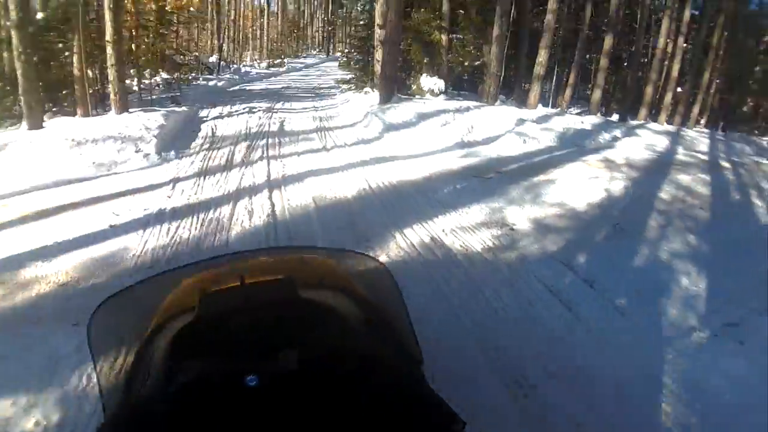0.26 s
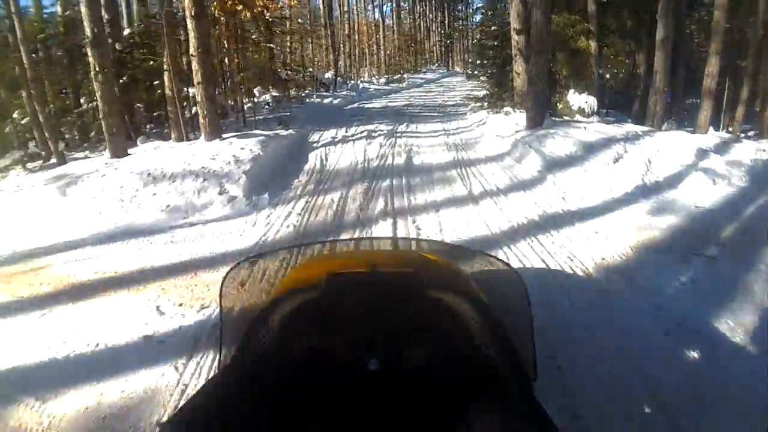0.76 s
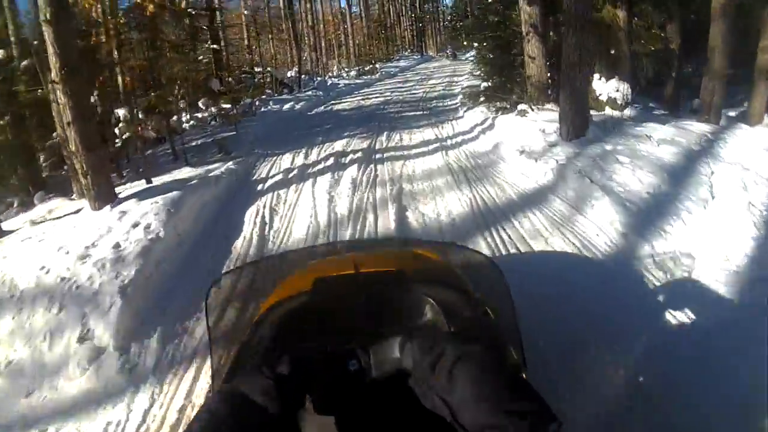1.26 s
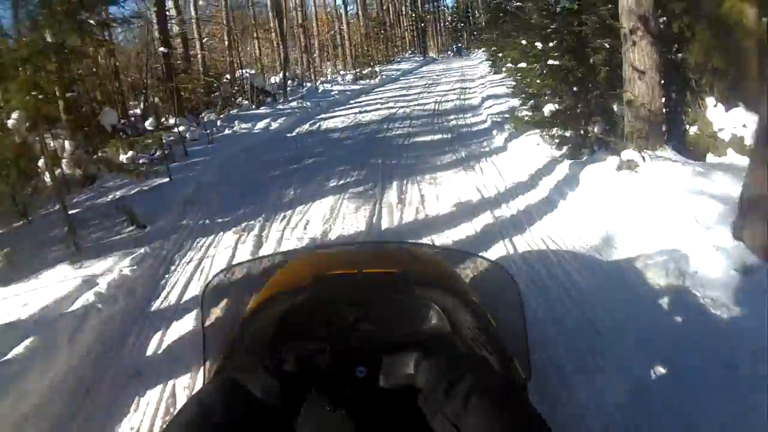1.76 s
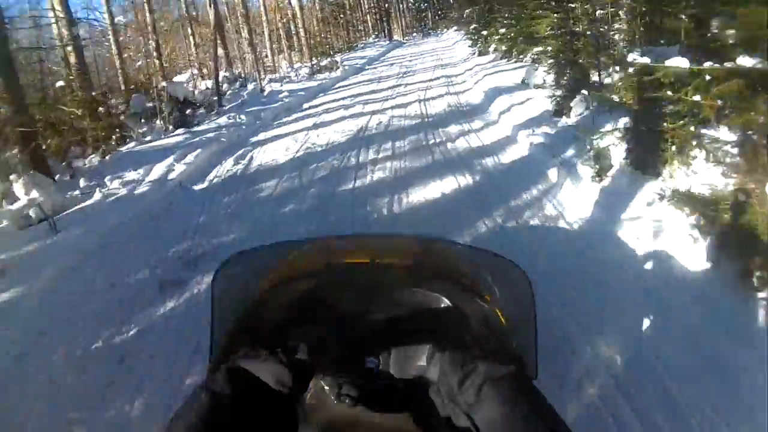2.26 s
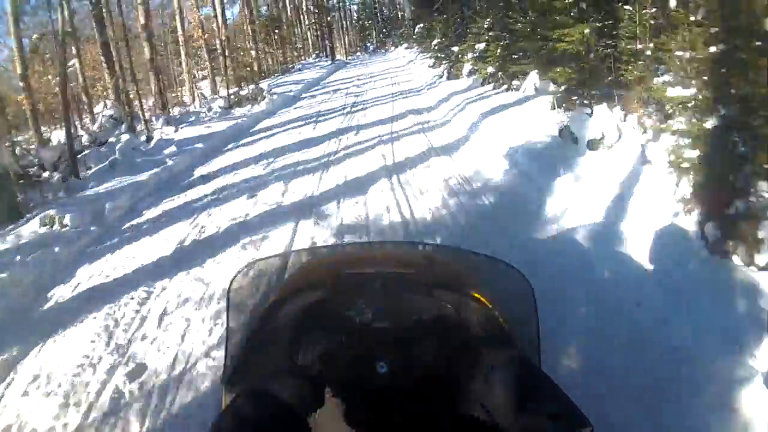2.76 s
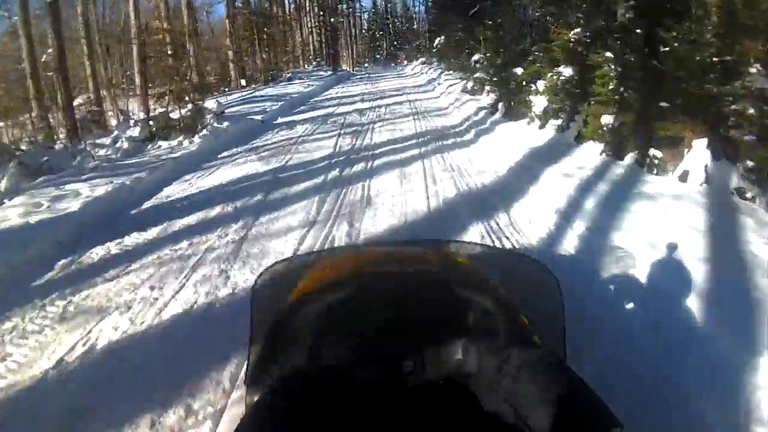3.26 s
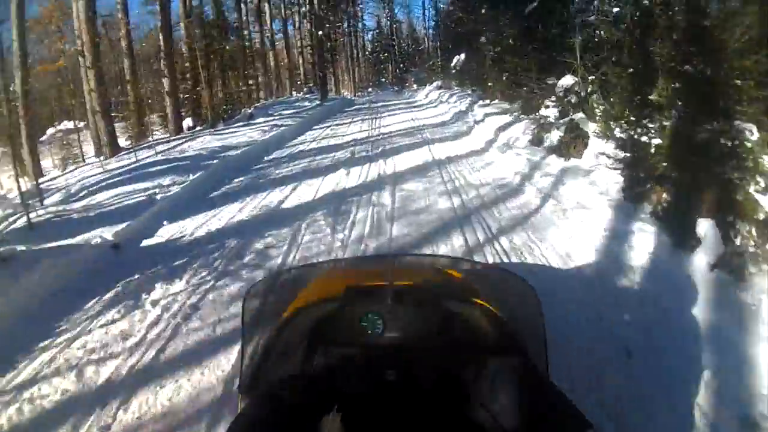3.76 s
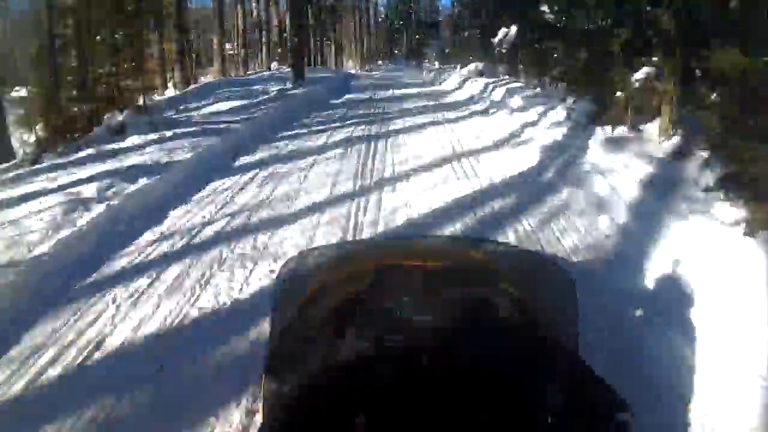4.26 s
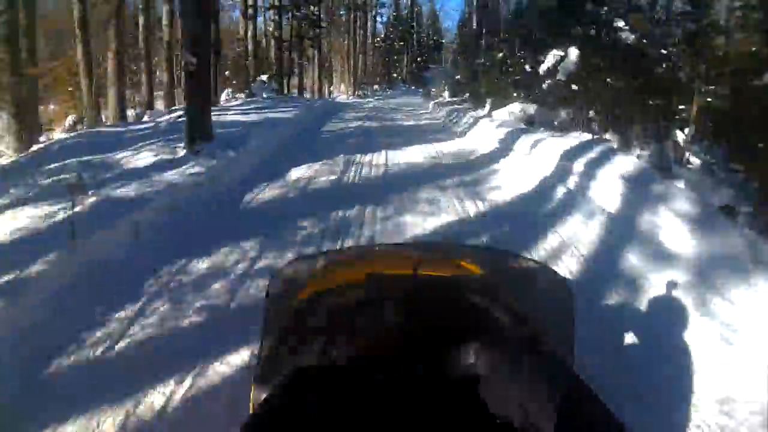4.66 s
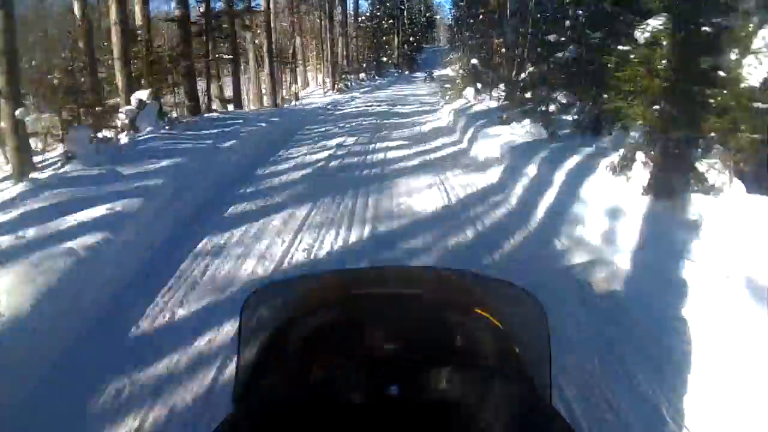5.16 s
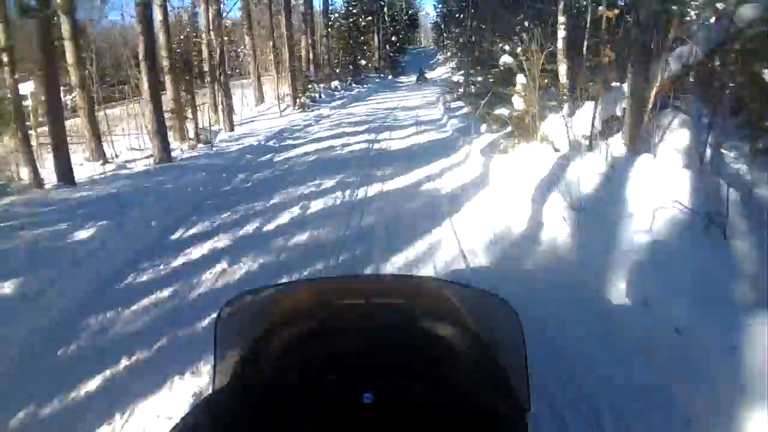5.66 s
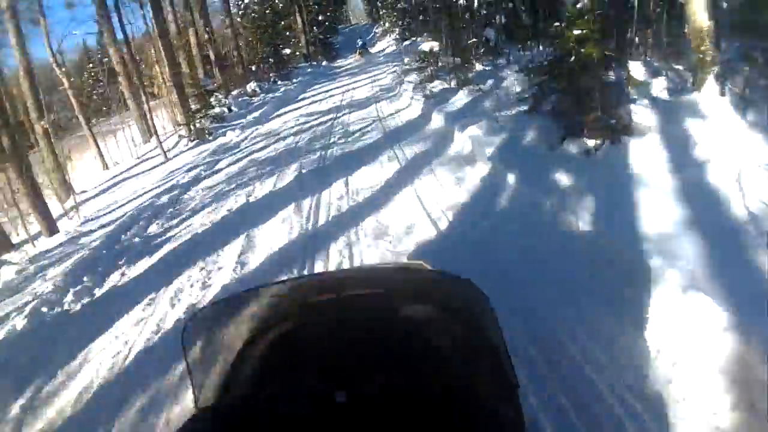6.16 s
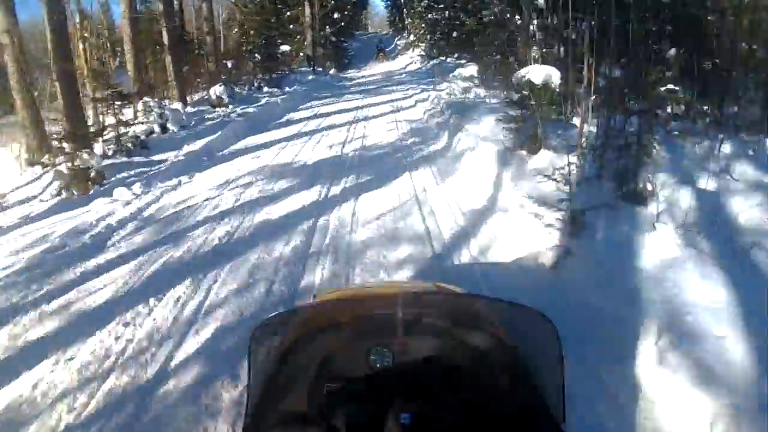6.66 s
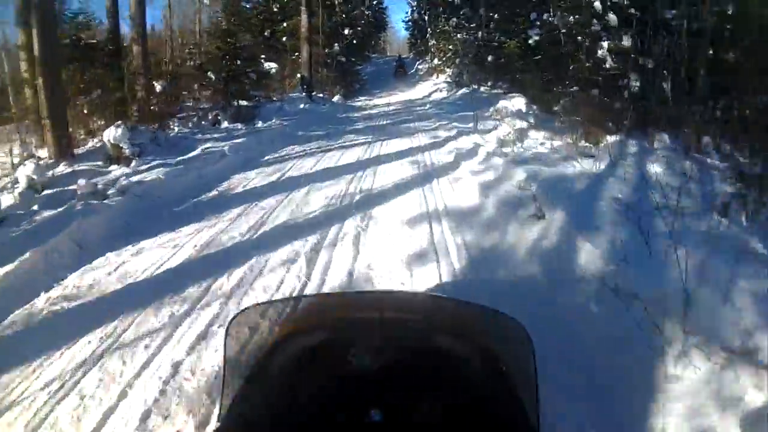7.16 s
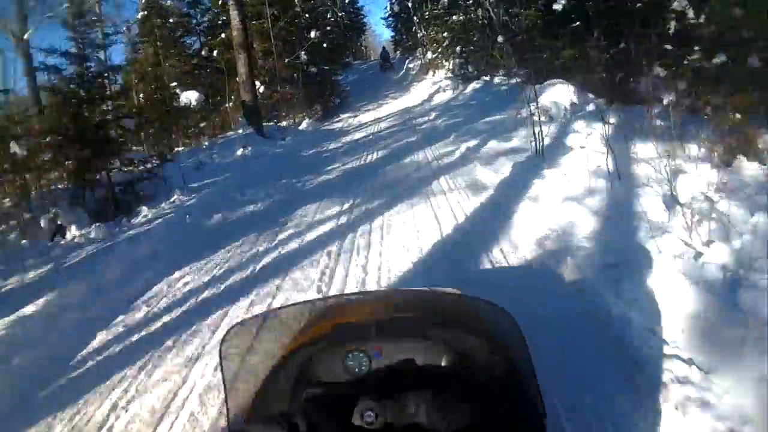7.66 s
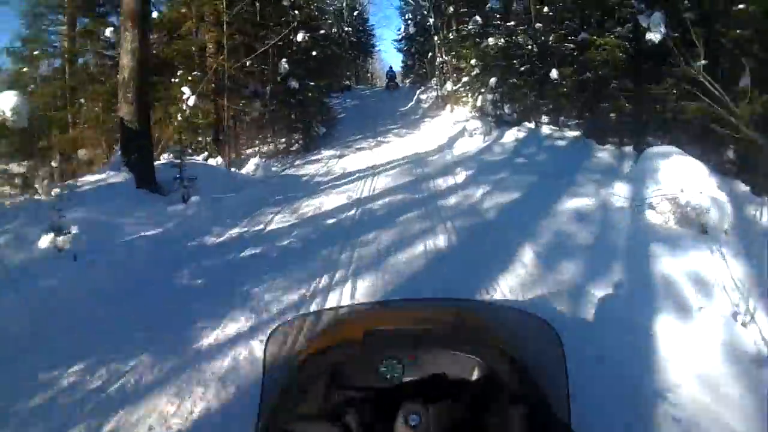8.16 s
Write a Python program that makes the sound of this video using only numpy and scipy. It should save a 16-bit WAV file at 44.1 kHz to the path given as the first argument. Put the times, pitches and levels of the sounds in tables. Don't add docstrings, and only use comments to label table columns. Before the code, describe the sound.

Muffled, nasal snowmobile engine heard by its rider: climbing, holding steady, easing off and pulling again over packed snow, with bumps clicking the microphone housing.

```python
import sys
import numpy as np
from scipy import signal
from scipy.fft import rfft, irfft, next_fast_len
from scipy.io import wavfile
from scipy.ndimage import uniform_filter1d

SR = 44100
rng = np.random.default_rng(int(sys.argv[2]) if len(sys.argv) > 2 else 0)


def linear_from_db(decibels):
    return 10 ** (np.asarray(decibels, float) / 20)


def materialize(psi):
    bounded = np.clip(np.atleast_2d(psi).T, -1, 1)
    quanta = np.round(bounded * 32767).astype(np.int16)
    wavfile.write(sys.argv[1], SR, quanta)


N = 370440
T = np.arange(N) / SR
CRUISE_HZ, PART_HZ = 109.6, 86.84
CRUISE_LUG_HZ = 240


def engine():
    hz, throttle, _ = controls()
    climb_hz_per_s = np.gradient(hz) * SR
    misfire_pct = 1.6 * (1 - throttle) ** 4
    scatter_pct = 0.16 + misfire_pct + 0.005 * np.maximum(climb_hz_per_s, 0)
    drift = 0.002
    phase = turns(hz * (1 + scatter_pct / 100 * walk(30) + drift * walk(3)))
    case_gain_db = 1.2 * case_db(np.arange(0, SR / 2))

    pulses = exhaust(hz, throttle, climb_hz_per_s, misfire_pct, phase, case_gain_db)
    orders = crank_orders(hz, phase, case_gain_db)
    clean_db = 0.5 - 11 * (1 - throttle) ** 2 + 0.08 * np.clip(climb_hz_per_s, 0, 30)
    level_db = law_db(cruise_db=-29.5, crank_db_per_octave=10, shut_loss_db=-0.6,
                      track_db_per_octave=1.2, pull_db=2.5)
    return pulses + linear_from_db(level_db) * (linear_from_db(-4) * gas(phase) + linear_from_db(clean_db - 1.5) * orders)


# order [crank multiple], level_db [dB], shut_loss_db [dB lost on a shut throttle]
EXHAUST_TONES = [(2, 0.7, 17.5), (4, 4.5, 16.5), (6, 0, 16), (8, 0, 14), (9, -19.5, 15.5), (16, -5, 22)]
# freq_hz [Hz], gain_db [dB]
PIPE_COLOUR = [(130, -2.5), (170, -11), (215, -1), (290, -13.5), (520, -14), (600, -28.5), (680, -35),
               (890, -24.5)]
# freq_hz [Hz], width_hz [Hz], gain_db [dB]
PIPE_RINGS = [(264, 36, -11.5), (411, 77.5, -15), (1001, 18, 8.5), (1744, 110, 4.5)]


def exhaust(hz, throttle, climb_hz_per_s, misfire_pct, phase, case_gain_db):
    grid_hz = np.arange(0, SR / 2)
    pipe_db = case_gain_db + spectrum_db(PIPE_COLOUR, grid_hz)
    pipe_db = pipe_db + sum(peak_db(grid_hz, *ring) for ring in PIPE_RINGS)
    lumps_db = 1.4 + 2 * misfire_pct
    out = 0
    for order, level_db, shut_loss_db in EXHAUST_TONES:
        tone_db = level_db - shut_loss_db * (1 - throttle) + pipe_db[(order * hz).astype(int)]
        tone = np.sin(order * phase + order)
        out = out + np.sqrt(2) * linear_from_db(tone_db + lumps_db * walk(14)) * tone
    return out * linear_from_db(2.5 * pull() + 0.05 * np.minimum(climb_hz_per_s, 0))


# order [crank multiple], level_db [dB as heard]
CRUISE_ORDERS = [(3, -32.5), (5, -31.5), (6, -23.5), (7, -20.5), (8, -12.5), (9, -12), (10, -15.5),
                 (11, -16.5), (12, -12.5), (13, -10.5), (14, -18), (15, -10), (16, 0), (17, -25.5),
                 (18, -16.5), (19, -16.5), (20, -15.5), (21, -17), (22, -29.5), (23, -18.5), (24, -9),
                 (25, -11.5), (26, -13.5), (27, -26.5), (28, -28.5), (29, -33), (30, -28.5), (31, -37),
                 (32, -33), (33, -25)]
# order [crank multiple], level_db [dB]
PART_ORDERS = [(3, -12.5), (5, -19.5), (6, -15), (7, -33.5), (8, -15), (9, -12), (10, -8.5), (11, -3),
               (12, -5), (13, -10.5), (14, -7.5), (15, -4.5), (16, -9), (17, -6.5), (18, -7.5), (19, -4.5),
               (20, -4), (21, -11), (22, -12), (23, -23), (24, -10.5), (25, -10), (26, -12), (27, -24),
               (28, -18), (29, -14.5), (30, -9.5), (31, -17), (32, -3), (33, -10.5)]


def crank_orders(hz, phase, case_gain_db):
    load = np.clip((hz - PART_HZ) / (CRUISE_HZ - PART_HZ), 0, 1)
    wander = [walk(rate=6) for _ in range(11)]
    exhaust_orders = [tone[0] for tone in EXHAUST_TONES]
    out = 0
    for (order, cruise_db), (_, part_db) in zip(CRUISE_ORDERS, PART_ORDERS):
        if order in exhaust_orders:
            continue
        cruise_source_db = cruise_db - case_gain_db[int(order * CRUISE_HZ)]
        part_source_db = 1.63 * part_db - 3.5 - case_gain_db[int(order * PART_HZ)]
        source_db = load * cruise_source_db + (1 - load) * part_source_db
        swell_db = 3.5 * np.tanh(wander[int(order) % 11])
        slip_rad = 0.4 * wander[int(order + 3) % 7]
        heard_db = source_db + case_gain_db[(order * hz).astype(int)] + swell_db
        out = out + linear_from_db(heard_db) * np.sin(order * phase + slip_rad + order * order)
    return out


def gas(phase):
    puff = 1 + 0.2 * np.cos(2 * phase) + 0.17 * np.cos(phase)
    return coloured(puff * linear_from_db(0.8 * walk(25)) * rng.standard_normal(N), case_db)


def fan():
    hz, throttle, _ = controls()
    blades_per_turn, belt_slip = 17.57, 0.015
    blade_hz = blades_per_turn * hz * (1 - belt_slip * throttle ** 2)
    blades = whine(blade_hz, level_db=-58, resonance=(1348, 75, 19),
                   flutter_db=1.6, smear_rad=0.15, second_db=-28)
    speed_db = 26.5 * np.maximum(np.log2(hz / PART_HZ), 0)
    duct_dip_db = peak_db(blade_hz, 1420, 70, -13)
    case_ring_db = throttle * peak_db(blade_hz, 1775, 130, 14)
    return blades * linear_from_db(speed_db + duct_dip_db + case_ring_db)


def track():
    return whine(controls()[2], level_db=-75, resonance=(213, 110, 21.5),
                 flutter_db=3.0, smear_rad=0.53, second_db=-9.5)


def whine(hz, level_db, resonance, flutter_db, smear_rad, second_db):
    phase = turns(hz) + smear_rad * walk(20)
    first = linear_from_db(peak_db(hz, *resonance)) * np.sin(phase)
    second = linear_from_db(second_db + peak_db(2 * hz, *resonance)) * np.sin(2 * phase)
    return np.sqrt(2) * linear_from_db(level_db + flutter_db * walk(12)) * (first + second)


# start_s [s], peak_db [dB], thud_db [dB], body_db [dB], click_db [dB]
KNOCKS = [(0.4732, -34.5, -23, 1, -13), (0.635, -20, -21.5, -7.5, -20), (1.1461, -19, -35, -10.5, -17.5),
          (1.5546, -21.5, -30, -7, -23), (3.5518, -17, -19.5, -5.5, -19.5), (3.6075, -19.5, -17, -8, -30),
          (4.002, -20.5, -20, -2, -22), (4.072, -17.5, -25, -10, -26), (4.144, -13, -26, -8.5, -16.5),
          (4.9541, -20.5, -26, -6.5, -18), (5.4902, -20.5, -37, -3, -20), (5.5502, -29, -27, -4, -22),
          (5.6803, -33, -15, 0.5, -25), (6.1618, -12.5, -44, -4.5, -19.5), (6.3552, -31.5, -15, -2, -28),
          (6.406, -21, -12.5, -9, -23), (6.5506, -25, -22, -8.5, -32), (6.8163, -20.5, -20, -11, -18),
          (7.099, -19, -28, -6, -21), (7.174, -22.5, -24, -5, -20), (7.209, -24, -23, -2, -17),
          (7.2468, -26, -17, -5.5, -22), (7.9492, -29.5, -21, -4, -21), (8.1604, -24.5, -20, -5.5, -19.5)]
# freq_hz [Hz], t60_s [s], level_db [dB], part [0 thud, 1 body, 2 ring, 3 click]
SHELL_MODES = [(254, 0.042, 0.5, 0), (420, 0.037, -5, 0), (730, 0.044, -1.5, 0), (1055, 0.028, -8, 3),
               (1305, 0.022, 1.5, 1.5), (1640, 0.026, -6, 2), (2152, 0.022, 3.5, 1),
               (2650, 0.024, -4.5, -0.5), (3190, 0.024, -15, -2.5), (3780, 0.012, 0, 3),
               (3993, 0.017, 2, 3), (4500, .012, -6, 3)]


def knocks():
    size, crack_size = 4096, 256
    out, t = np.zeros(N + size), np.arange(size) / SR
    chance = rng.standard_normal((len(KNOCKS), 2 * len(SHELL_MODES)))
    cracks = coloured(rng.standard_normal(N), lambda hz: case_db(hz) - 14 * (hz < 950))
    cracks = cracks[:crack_size * len(KNOCKS)].reshape(-1, crack_size)
    rise_s = (0.0016, 0.00067, 0.0038, 0.00035)
    for (start_s, peak, thud_db, body_db, click_db), luck, crack in zip(KNOCKS, chance, cracks):
        part_db = (thud_db + 5.5, body_db + 4.5, 8.5, click_db + 4.5)
        ring = 0
        for k, (hz, t60_s, mode_db, part) in enumerate(SHELL_MODES):
            part = int(part)
            detune, spread = 0.013 * luck[2 * k], 1.1 * luck[2 * k + 1]
            shape = np.exp(-np.log(1000) * t / t60_s) * (1 - np.exp(-(t / rise_s[part]) ** 2))
            tone = np.sin(2 * np.pi * hz * (1 + detune) * t + spread)
            ring = ring + linear_from_db(mode_db + part_db[part] + spread) * shape * tone
        ring[:crack_size] += linear_from_db(-9) * crack * np.hanning(crack_size) ** 2
        i = int((start_s - 0.0006) * SR)
        out[i:i + size] += linear_from_db(peak) * ring
    out = out[:N]
    rattle = linear_from_db(-51) * np.abs(out) * coloured(rng.standard_normal(N), air_db)
    walls = signal.butter(8, 4900, fs=SR, output="sos")
    return signal.sosfilt(walls, out) + rattle


# freq_hz [Hz], level_db [dB]
RUMBLE_COLOUR = [(20, -9.5), (45, -4), (90, 2.5), (150, 12), (250, 8.5), (350, 3.5), (600, 2.5), (800, -13),
                 (1500, -35)]


def rumble():
    level_db = law_db(cruise_db=-75, crank_db_per_octave=-2, shut_loss_db=-0.8,
                      track_db_per_octave=2.5, pull_db=-0.5)
    rougher_db_per_s = 0.72
    grind = linear_from_db(1.2 * walk(10)) * rng.standard_normal(N)
    grind = coloured(grind, lambda hz: spectrum_db(RUMBLE_COLOUR, hz))
    return linear_from_db(level_db + rougher_db_per_s * T + 14) * grind


def air_hiss():
    level_db = law_db(cruise_db=-70.5, crank_db_per_octave=15.5, shut_loss_db=2.5,
                      track_db_per_octave=-1.1, pull_db=1)
    flutter = linear_from_db(0.4 * walk(12) + 0.9 * walk(40))
    return linear_from_db(level_db + 1.5) * coloured(flutter * rng.standard_normal(N), air_db)


# peak_s [s], peak_db [dB]
GUSTS = [(.02, -74), (.44, -74), (.89, -72), (1.52, -61), (2.34, -84), (3.55, -63), (3.74, -63.5),
         (4.02, -64.5), (4.23, -62.5), (4.92, -70), (5.19, -72), (5.57, -75), (6.2, -71), (6.6, -63),
         (6.81, -76), (7.2, -74), (7.5, -66), (8.19, -77)]


def wind():
    rise_s, fall_s, breeze_db, breeze_db_per_octave = 0.045, 0.07, -83, 8
    band = signal.butter(2, [18, 45], "band", fs=SR, output="sos")
    buffet = unit(signal.sosfilt(band, rng.standard_normal(N)))
    level = linear_from_db(breeze_db + breeze_db_per_octave * np.log2(controls()[2] / CRUISE_LUG_HZ))
    for peak_s, gust_db in GUSTS:
        level = level + linear_from_db(gust_db) * np.exp(np.minimum((T - peak_s) / rise_s, (peak_s - T) / fall_s))
    return buffet * level


# freq_hz [Hz], gain_db [dB]
CASE_COLOUR = [(60, -51), (160, -31.5), (300, -30.5), (600, -29), (700, -19), (1500, -17), (2400, -18),
               (3300, -27), (4300, -38.5), (5400, -53), (5900, -73.5), (16000, -100)]
# freq_hz [Hz], width_hz [Hz], gain_db [dB]
CASE_MODES = [(996.7, 88, 14.5), (1303, 110, 8), (1765, 188, 13), (1850, 29, -9.5), (2197, 230, 9),
              (2396, 100, -11), (2764, 236, 15), (3092, 130, 10), (3827, 290, 10), (5170, 230, 9)]


def case_db(hz):
    return spectrum_db(CASE_COLOUR, hz) + sum(peak_db(hz, *mode) for mode in CASE_MODES)


# freq_hz [Hz], level_db [dB]
AIR_COLOUR = [(4500, -29), (5500, -8), (6000, -10.5), (6500, -8), (7500, -12.5), (8200, -11), (9000, -5.5),
              (10500, -2), (12400, -6.5), (13400, -8.5), (16000, -15)]
# [dB, rib height is 5 + 0.3 times this]
AIR_PEAKS = [(9600, 270, -2.5), (10800, 140, -1), (11600, 150, -2.5), (13400, 260, -4.5), (14400, 360, -9)]


def air_db(hz):
    ribs_db = sum(peak_db(hz, f, width_hz, 5 + 0.3 * g) for f, width_hz, g in AIR_PEAKS)
    return spectrum_db(AIR_COLOUR, hz) + ribs_db


# time_s [s], crank_hz [turns per s]
CRANK_SPEED = [(0, 63.85), (.5, 72.42), (1.14, 76.15), (1.5, 84.25), (1.83, 92.34), (2.03, 104.9),
               (2.2, 109), (2.57, 110.5), (3.11, 108.6), (3.39, 110.7), (4.53, 111.9), (4.84, 87.9),
               (5.17, 77.3), (5.52, 73.58), (6.58, 74.38), (6.8, 76.92), (7.27, 88.25), (8.4, 86.1)]
# time_s [s], opening [0-1]
THROTTLE = [(0, .62), (1.2, .57), (1.7, 0.74), (2.15, 0.93), (3, .9), (3.6, 0.94), (4.52, 1), (4.66, .25),
            (4.9, .03), (5.5, .2), (6.55, .22), (6.85, 0.51), (7.25, 0.61), (8.4, 0.51)]
# time_s [s], lug_hz [lugs per s]
TRACK_SPEED = [(0, 98), (1.05, 105), (1.8, 135), (2.1, 176), (2.62, 216), (3.5, 238), (4.05, 262),
               (4.55, 290), (4.8, 263), (5.96, 223), (6.6, 209), (8.4, 202)]


def controls():
    flywheel_s = 0.07
    hz = uniform_filter1d(curve(CRANK_SPEED), int(flywheel_s * SR), mode="nearest")
    return hz, np.clip(curve(THROTTLE), 0, 1), curve(TRACK_SPEED)


def pull():
    pull_s, full_pull_hz_per_s = 0.35, 100
    gain_hz_per_s = np.maximum(np.gradient(curve(TRACK_SPEED)) * SR, 0)
    return uniform_filter1d(gain_hz_per_s, int(pull_s * SR)) / full_pull_hz_per_s


def law_db(cruise_db, crank_db_per_octave, shut_loss_db, track_db_per_octave, pull_db):
    hz, throttle, lug_hz = controls()
    crank_db = crank_db_per_octave * np.log2(hz / CRUISE_HZ)
    track_db = track_db_per_octave * np.log2(lug_hz / CRUISE_LUG_HZ)
    return cruise_db + crank_db + track_db - shut_loss_db * (1 - throttle) + pull_db * pull()


def curve(table):
    time_s, value = np.transpose(table)
    return np.interp(T, time_s, value)


def turns(hz):
    return 2 * np.pi * np.cumsum(hz) / SR


def unit(x):
    return x / np.sqrt(np.mean(x ** 2))


def walk(rate):
    k = int(SR / rate)
    steps = np.repeat(rng.standard_normal(N // k + 1), k)
    return unit(uniform_filter1d(uniform_filter1d(steps, k), k)[:N])


def peak_db(hz, centre_hz, width_hz, db):
    return db / (1 + (2 * (hz - centre_hz) / width_hz) ** 2)


def spectrum_db(points, hz):
    freq_hz, db = np.transpose(points)
    return np.interp(np.log(hz + 1), np.log(freq_hz), db)


def coloured(x, gain_db):
    size = next_fast_len(N)
    hz = np.arange(size // 2 + 1) * SR / size
    return unit(irfft(rfft(x, size) * linear_from_db(gain_db(hz)), size)[:N])


def scene():
    machine = engine() + fan() + track()
    return (machine + knocks() + rumble() + air_hiss() + wind())[None]


def roll_off(x):
    return signal.sosfilt(signal.butter(12, 15710, fs=SR, output="sos"), x)


# freq_hz [Hz], level_db [dB]
CIRCUIT_TONES = [(15165, -93.5), (15256, -89.5)]
# freq_hz [Hz], width_hz [Hz]
WHINE_TRAPS = [(6000, 490), (8000, 1100)]


def record(dry):
    sound = dry + linear_from_db(-104) * np.diff(rng.standard_normal(N + 3), n=3)
    for hz, level_db in CIRCUIT_TONES:
        sound = sound + np.sqrt(2) * linear_from_db(level_db) * np.sin(2 * np.pi * hz * T + 0.5 * walk(40))
    for hz, width_hz in WHINE_TRAPS:
        sound = signal.lfilter(*signal.iirnotch(hz, hz / width_hz, SR), sound)
    top_cut = signal.ellip(10, 0.2, 60, 15750, fs=SR, output="sos")
    return roll_off(signal.sosfilt(top_cut, sound))


dry = scene()
out = record(dry)
materialize(out)
```